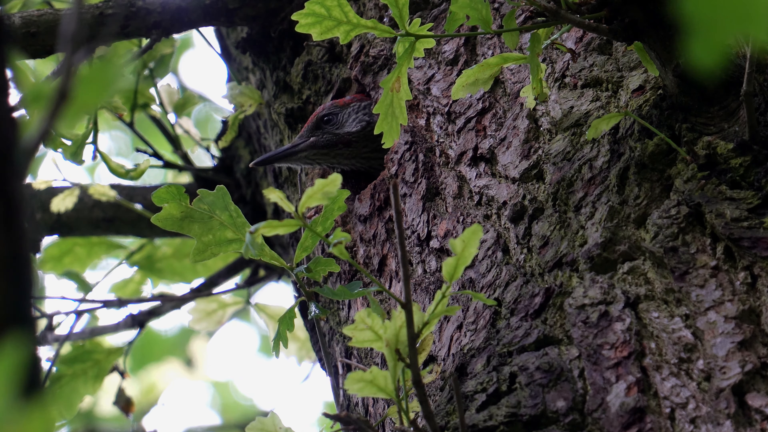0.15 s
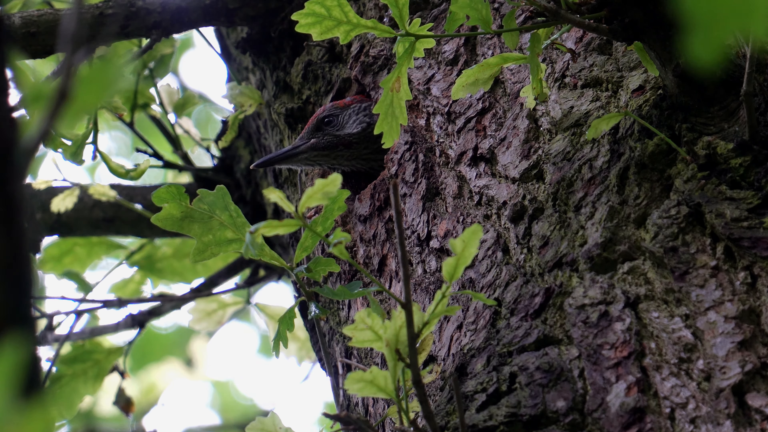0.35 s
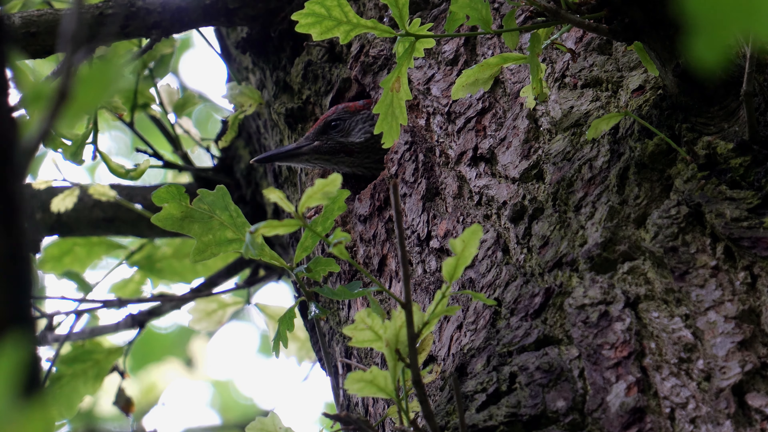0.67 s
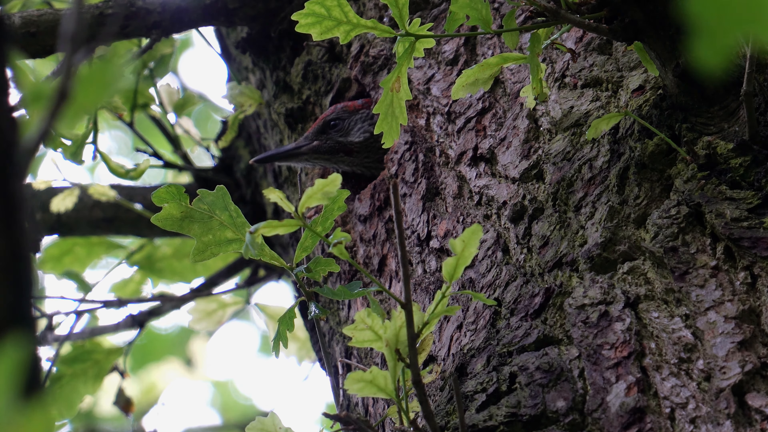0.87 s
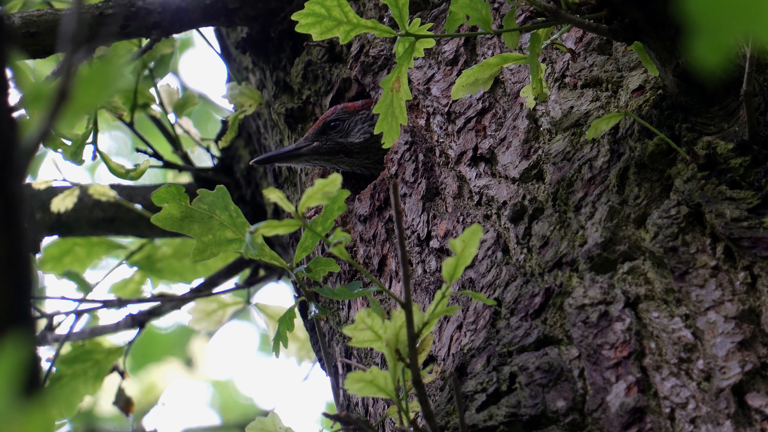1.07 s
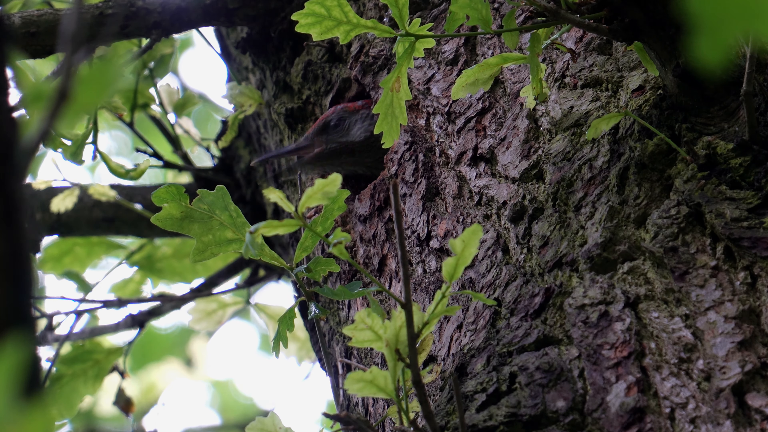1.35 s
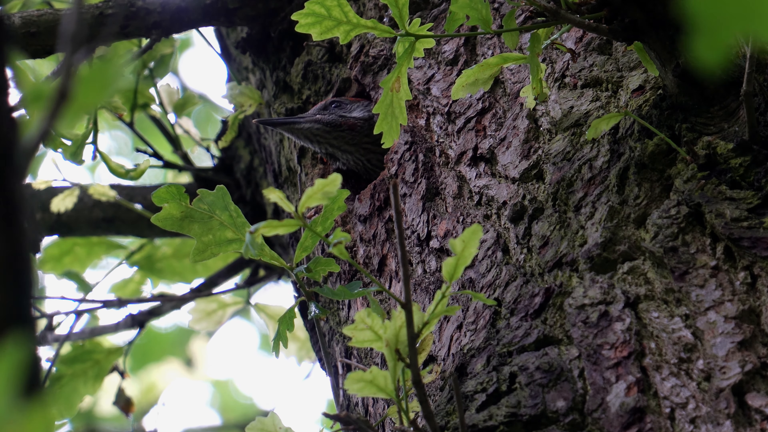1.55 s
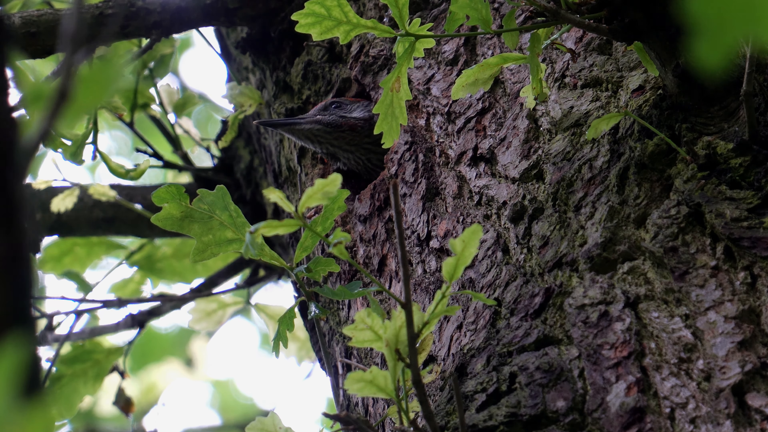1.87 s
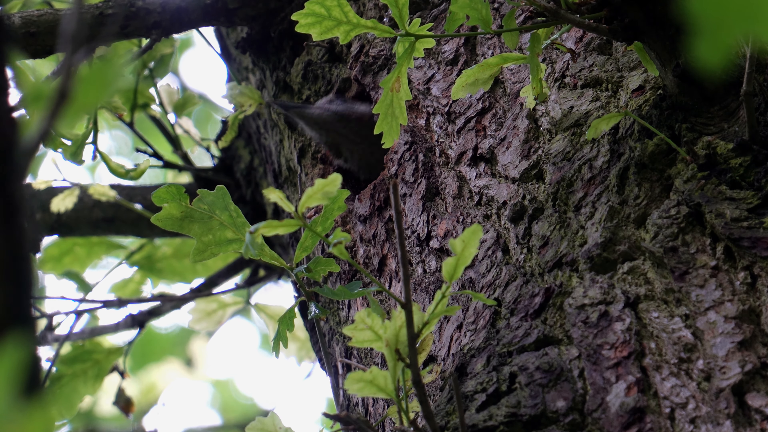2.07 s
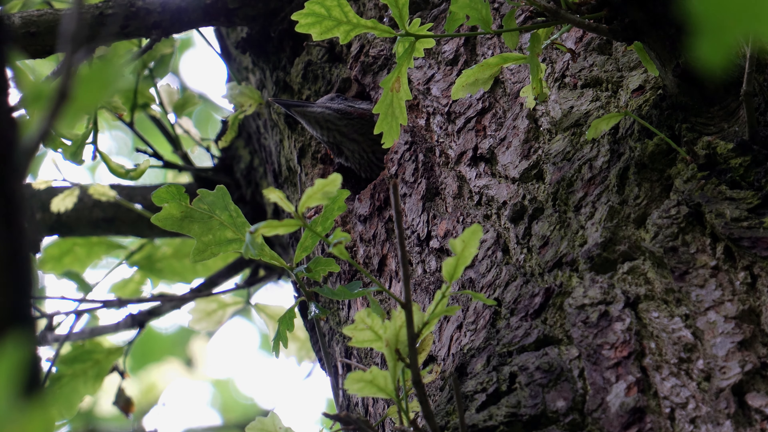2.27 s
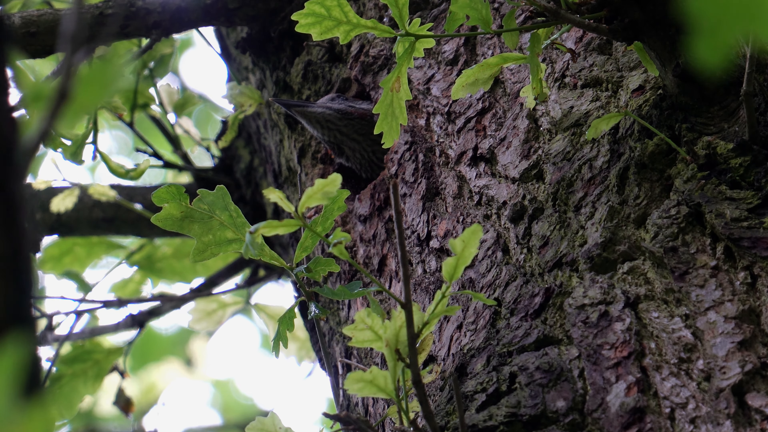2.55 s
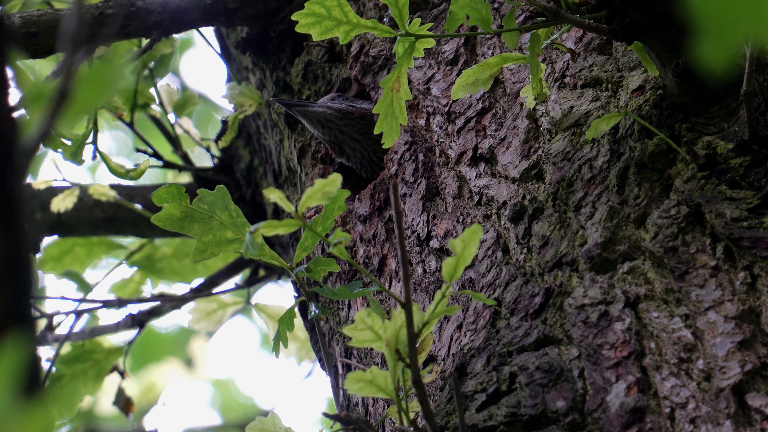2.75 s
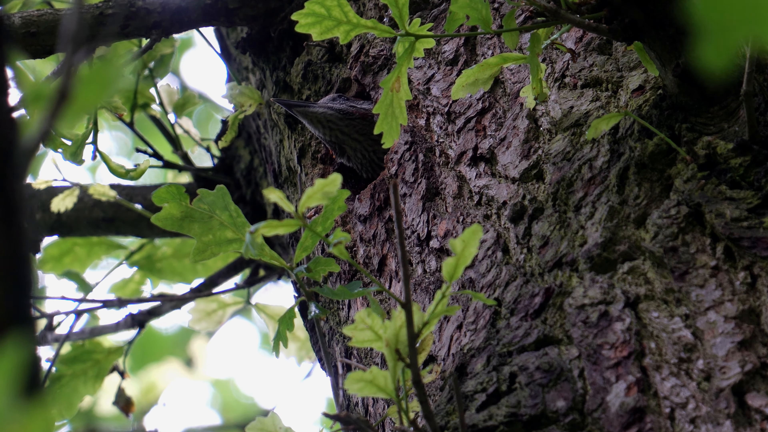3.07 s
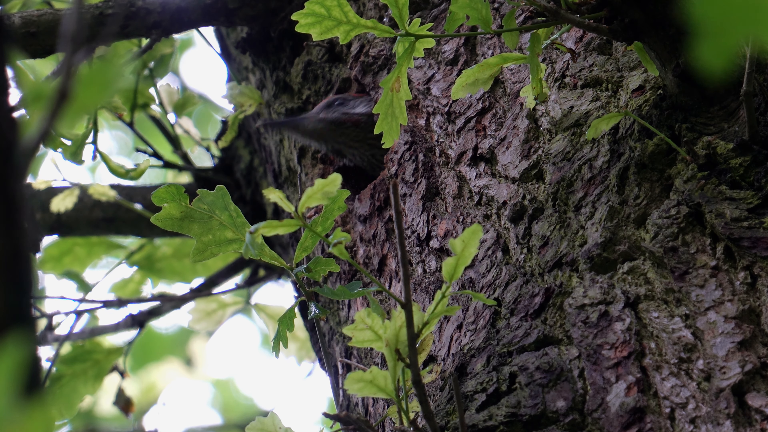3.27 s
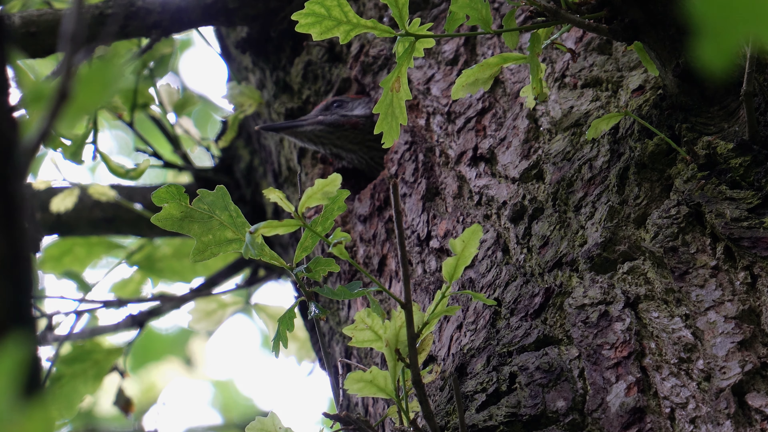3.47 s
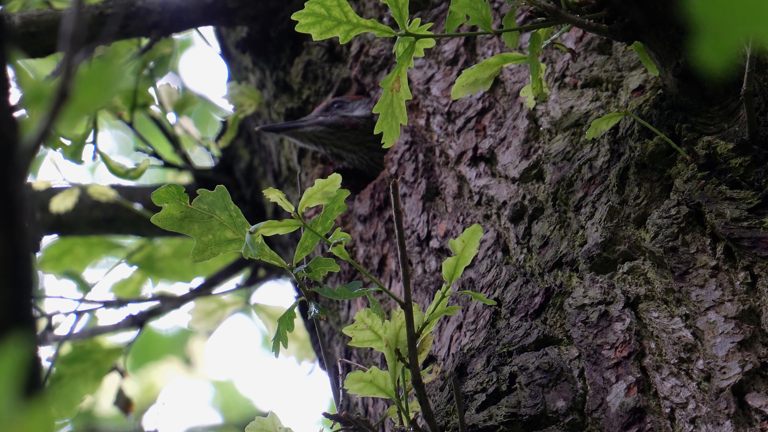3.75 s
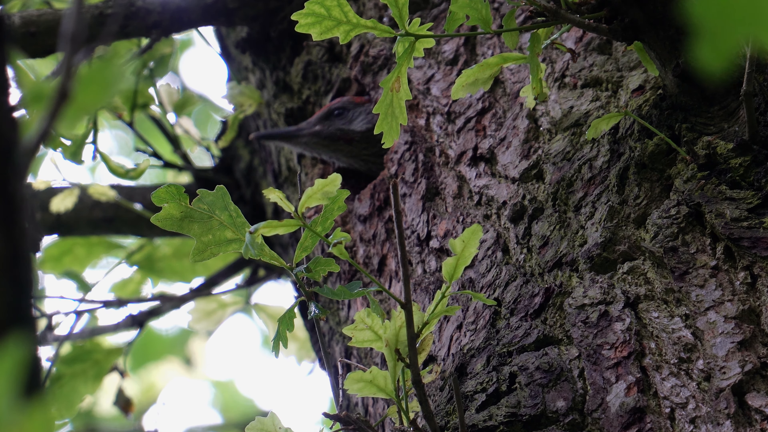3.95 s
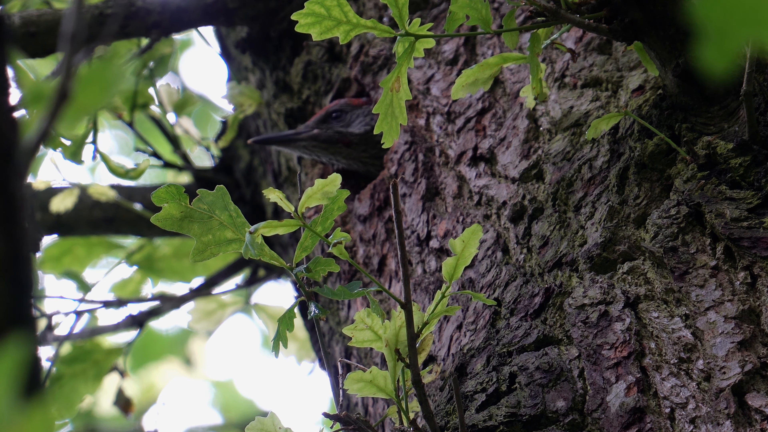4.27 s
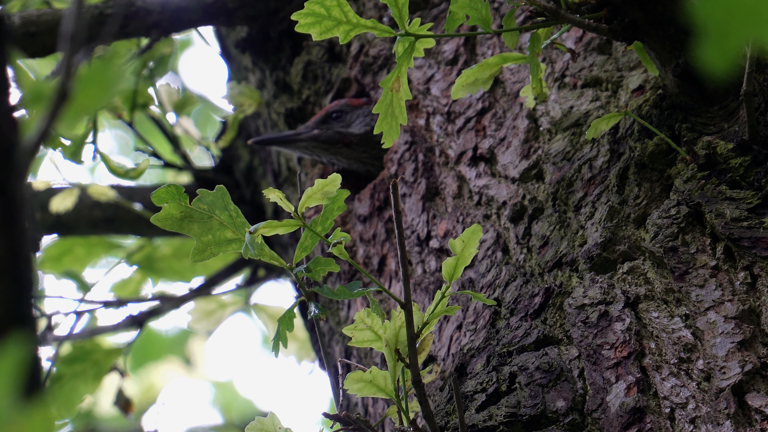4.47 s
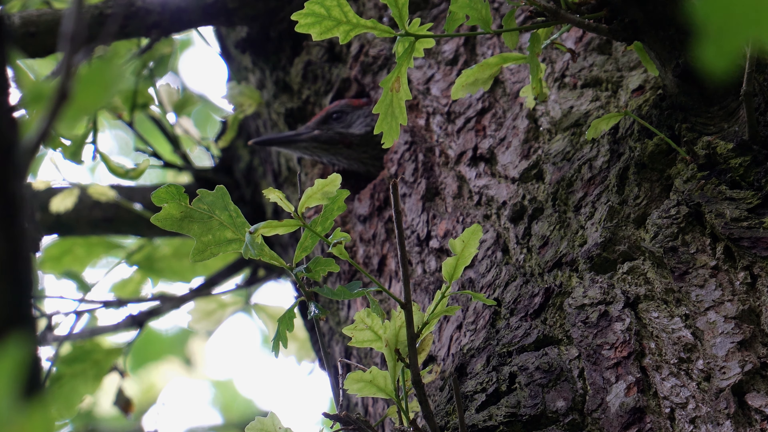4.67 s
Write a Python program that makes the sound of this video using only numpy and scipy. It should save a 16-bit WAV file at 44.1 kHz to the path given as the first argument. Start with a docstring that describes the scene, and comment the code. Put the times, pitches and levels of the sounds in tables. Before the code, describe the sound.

A young woodpecker calls from its nest hole in a wood, close, centred and louder than everything else. Each call is a sharp, high note about a tenth of a second long, opening with a tiny croak and sliding quickly down, with a slight echo. The calls come at about 0.1, 0.7, 1.5, 2.3, 3.4, 4, 5.2, 5.7, 6.3, 6.7, 7.1, 8.3 and 8.8 seconds, the last one the strongest. A quieter thrush, slightly left, sings pure, fluting, lightly warbled notes during the first 1.4 seconds and again from 7.3 seconds until the end. Distant small songbirds add thin, high, reverberant whistles and chirps throughout, with fast trills clearest in the first second, around 3.5 to 4 seconds and around 5 seconds. A soft, steady hush like far traffic runs underneath.

```python
"""An oak wood. A young woodpecker calls a short, sharp "kew" from its nest hole: a croak of pulses
rings the resonances of its throat, then a harmonic tone holds and slides down. A thrush flutes
nearby in almost pure tones. Farther off, small songbirds whistle, sweep and trill, smeared by
scattering among the trunks. A steady hush like far traffic and a faint rumble lie underneath."""
import sys
import numpy as np
from scipy import signal
from scipy.fft import rfft, irfft, next_fast_len
from scipy.io import wavfile
from scipy.ndimage import uniform_filter1d

SR = 44100
rng = np.random.default_rng(int(sys.argv[2]) if len(sys.argv) > 2 else 0)


def materialize(psi):
    """Save the field psi as 16-bit PCM at rate SR to the path in sys.argv[1].

    A 1-D psi becomes a single channel; in a 2-D psi each row is a channel.
    """
    bounded = np.clip(np.atleast_2d(psi).T, -1, 1)
    quanta = np.round(bounded * 32767).astype(np.int16)
    wavfile.write(sys.argv[1], SR, quanta)


N = 433944


def woodpecker():
    """Source and filter: a gliding harmonic tone, plus pulses and breath shaped by the throat."""
    # The calls. Each row: start in seconds, level in dB, top pitch in Hz, time the pitch holds,
    # time the call stays loud and time of the fall, all in seconds, second harmonic lift in dB.
    calls = [(.072, -16.5, 2447, 0.016, .021, 0.057, 0.5), (.677, -16, 2496, .015, 0.019, .07, 0.5),
             (1.473, -17, 2376, 0.0064, 0.024, 0.048, 2), (2.263, -18.5, 2340, 0.0074, 0.015, 0.041, 5.5),
             (3.447, -18.5, 2310, .017, .021, .045, 3.5), (4.016, -16.5, 2432, .018, .023, 0.056, -0.5),
             (5.185, -19.5, 2257, 0.015, 0.022, 0.039, -1.5),
             (5.685, -16.5, 2510, .015, 0.022, 0.059, -4.5), (6.29, -16, 2432, .015, 0.017, .054, -7.5),
             (6.657, -15.5, 2487, 0.0034, 0.024, 0.074, -1.5),
             (7.1, -16.5, 2305, 0.027, 0.025, 0.045, -0.5), (8.273, -16, 2390, 0.017, 0.026, 0.054, 3),
             (8.846, -13.5, 2400, .017, .021, 0.073, -1)]
    slide_hz_per_s, lowest_hz, droop_hz = 17000, 1390, 450   # a last droop adds to the slide
    croak_s, lead_s = .024, .003   # the croak and the tone begin this long before the start
    voice, excitation = np.zeros(N), np.zeros(N) + 1e-18
    jitter, flutter, breath = wander(N, 510), wander(N, 610), rng.standard_normal((2, N))
    for s, db, top_hz, held_s, loud_s, fall_s, second_db in calls:
        t = np.arange(round((held_s + fall_s) * SR)) / SR
        onset = round(s * SR)
        here = slice(onset, onset + len(t))
        fallen = np.clip((t - held_s) / fall_s, 0, 1)
        end_hz = max(top_hz - slide_hz_per_s * fall_s, lowest_hz)
        rise_hz = top_hz * (1 - 0.0617 * np.exp(-t / 0.005))
        hz = rise_hz - (top_hz - end_hz) * fallen ** .9 - droop_hz * fallen ** 8
        hz = uniform_filter1d(hz, size=260) * (1 + 0.01 * jitter[here])
        phase = 2 * np.pi * np.cumsum(hz) / SR
        envelope = (1 - np.exp(-t / .0055)) * np.clip((1 - fallen) / .3, 0, 1)
        softened = np.clip((t - loud_s) / 0.0067, 0, 1)
        fade_db = uniform_filter1d(-7.0 * softened - 8.1 * fallen, size=260)
        tone = harmonics(phase, fallen, fade_db, flutter[here], second_db)
        # Period doubling: strong and weak cycles alternate, adding a line at 1.5 times the pitch.
        tone += from_db(-28.5 + 2 * fade_db + 7.45 * jitter[here]) * np.sin(1.5 * phase)
        add(voice, s - lead_s, from_db(db) * envelope * tone)
        add(excitation, s - lead_s, from_db(db + 2 * fade_db - 37) * envelope * breath[0, here])
        before = slice(onset - round((croak_s + lead_s) * SR), onset)
        add(excitation, s - croak_s, croak(jitter[before], breath[:, before]))
    voice += throat(excitation)
    highpass = signal.butter(2, 500, "high", fs=SR, output="sos")   # a small bird radiates no bass
    return signal.sosfilt(highpass, voice)


def harmonics(phase, fallen, fade_db, flutter, second_db):
    """A periodic vibration is a harmonic series; here the high members flutter more and fade first."""
    # Base levels of harmonics 1 to 6 in dB.
    levels_db = [-1, -5.5, -21.5, -23, -35.5, -31.5]
    upper_db = 5.5 - 3 * np.sqrt(fallen)   # the slide dulls harmonics 3 to 6
    tone = 0
    for k, db in enumerate(levels_db):
        lift_db = (k == 1) * second_db + (k > 1) * upper_db
        flutter_db = (k + 4 * fallen) * flutter
        tone += from_db(db + lift_db + fade_db * (1 + 0.95 * k) + flutter_db) * np.sin((k + 1) * phase)
    return tone


def croak(jitter, noise):
    """Pulse excitation: a quickening train, uneven in timing and strength, sounds rough."""
    start_hz, end_hz = 560, 960
    u = np.arange(len(jitter)) / len(jitter)
    rate_hz = (start_hz + (end_hz - start_hz) * u ** .8) * (1 + .07 * jitter)
    cycles = np.floor(np.cumsum(rate_hz) / SR)
    pulses = np.diff(cycles, prepend=0) * from_db(1.5 * noise[0]) + .06 * noise[1]
    rounded = np.convolve(pulses, np.hanning(6) / 2.5, "same")
    return from_db(-29.5 - 26 * (1 - u) ** 2) * np.minimum(12 * (1 - u), 2) * rounded


def throat(excitation):
    """Resonance: each formant of the throat rings as a damped oscillator."""
    # The formants. Each row: frequency in Hz, bandwidth in Hz, gain in dB.
    formants = [(800, 230, -18.5), (2380, 910, 4), (3800, 1220, 5), (5500, 600, -4.5), (10600, 3300, 1.5)]
    out = np.zeros(N)
    for k, (hz, width_hz, db) in enumerate(formants):
        radius = np.exp(-np.pi * width_hz / SR)
        feedback = [1, -2 * radius * np.cos(2 * np.pi * hz / SR), radius ** 2]
        out += (-1) ** k * from_db(db) * signal.lfilter([1, 0, -1], feedback, excitation)
    return out


def reflections(voice):
    """Interference and echo: a bough's reflection beats with the slide; rough bark returns a smear."""
    bough_s, echo_s, smear_s = .008, 0.057, 0.005
    voice = voice + from_db(-12) * np.pad(voice, (round(bough_s * SR), 0))[:N]
    bark = rng.standard_normal(round(smear_s * SR))
    smeared = signal.fftconvolve(voice, bark / np.linalg.norm(bark))
    echo = np.pad(smeared, (round(echo_s * SR), 0))[:N]
    scatter = wood(voice, gap_s=0.00079, build_s=0.0011, likeness=0.71, decay_scale=0.75)
    return voice * from_db([[-.2], [.2]]) + from_db(-19) * echo + from_db(-6.5) * scatter


def thrush():
    """Almost pure tones a little to the left; amplitude modulation warbles the longer ones."""
    # The song. Each row: start and length in seconds, start, middle and end pitch in Hz, level in dB.
    notes = [(0.205, 0.12, 1874, 1873, 1815, -42), (.37, 0.17, 1822, 1935, 1893, -41.5),
             (0.584, .038, 2880, 2800, 2070, -47.5), (0.622, 0.032, 2860, 2410, 2100, -39),
             (0.703, 0.078, 2310, 2295, 2316, -33), (0.997, 0.13, 2060, 2165, 2058, -36),
             (1.1, 0.18, 2096, 2086, 1990, -34.5), (1.363, 0.037, 2600, 2800, 2950, -52.5),
             (7.295, 0.068, 2093, 1950, 2030, -44), (7.335, .092, 1950, 1770, 1670, -43),
             (7.538, 0.06, 2027, 1990, 1990, -40), (7.605, 0.049, 1880, 1884, 1830, -39),
             (7.666, 0.063, 2030, 2105, 2050, -37.5), (7.807, 0.055, 2710, 2620, 2150, -42.5),
             (7.933, 0.193, 3220, 3120, 3160, -49.5), (7.944, 0.15, 2080, 2317, 2110, -32),
             (8.324, 0.015, 2540, 2490, 2420, -29), (8.488, 0.13, 2700, 2936, 2900, -40),
             (8.895, 0.063, 2580, 2274, 2100, -33.5), (9.343, .052, 2190, 2040, 1850, -47.5),
             (9.744, 0.073, 2130, 2074, 2010, -52)]
    warble_hz, warble_from_s, depth_per_s = 23.9, 0.071, 5.3
    song, waver = np.zeros(N), 0.0053 * wander(N, 78)
    for s, length, *pitches_hz, db in notes:
        note = whistle(length, *pitches_hz, waver[round(s * SR):])
        t = np.arange(len(note)) / SR
        depth = np.clip(depth_per_s * (length - warble_from_s), 0, 1)
        warble = 1 - depth / 2 * (1 + np.sin(2 * np.pi * warble_hz * t))
        add(song, s, from_db(db) * note * warble)
    scatter = wood(song, gap_s=0.0015, build_s=0.0026, likeness=0.52, decay_scale=1.0)
    return song * from_db([[1.1], [-1.1]]) + from_db(-0.5) * scatter


def songbirds():
    """Direct sound weakens with distance, so the far birds arrive mostly as a diffuse field."""
    # Far steady notes. Each row: start and length in seconds, pitch in Hz, level in dB.
    held = [(0, 0.026, 4130, -28), (1.541, .35, 5950, -37.5), (1.875, 0.15, 4085, -36.5),
            (2.157, 0.13, 7480, -42), (2.697, 0.2, 3810, -48), (3.02, 0.11, 7190, -52.5),
            (3.297, 0.05, 5345, -40), (3.622, 0.4, 8640, -46.5), (4.095, 0.088, 5890, -34.5),
            (4.194, 0.13, 6470, -41), (4.304, 0.059, 4058, -38.5), (4.453, 0.089, 7310, -50),
            (6.279, 0.11, 7220, -45), (6.311, 0.57, 4930, -44.5), (6.7, .12, 6915, -39.5),
            (7.745, 0.11, 6083, -34), (8.077, 0.34, 7750, -58), (8.672, 0.13, 7340, -47.5),
            (8.732, 0.15, 6110, -34.5)]
    # Far glides. Each row: start and length in seconds, start and end pitch in Hz, level in dB.
    glides = [(0, 0.13, 6750, 6080, -34.5), (0.014, 0.05, 7000, 7880, -36.5),
              (1.124, .082, 7240, 7800, -36.5), (1.267, 0.071, 7550, 6800, -45),
              (1.365, 0.1, 3800, 3550, -41.5), (2.113, 0.045, 7980, 7060, -35.5),
              (2.166, 0.09, 4580, 3000, -38), (2.456, 0.16, 5806, 5414, -37), (2.516, .26, 7550, 6940, -51),
              (2.627, 0.044, 8640, 8350, -41), (3.349, 0.036, 6100, 8400, -37),
              (3.457, 0.1, 8430, 9180, -40), (3.578, 0.037, 8860, 7280, -41),
              (3.761, .055, 8500, 7300, -43), (4.561, 0.061, 5500, 4100, -40),
              (4.721, 0.056, 6640, 4280, -33.5), (5.536, 0.11, 7060, 7880, -37.5),
              (5.889, 0.1, 4600, 4355, -36), (5.986, 0.049, 5550, 6550, -34.5),
              (6.075, 0.15, 4210, 3440, -46), (6.178, .078, 5220, 6000, -36),
              (6.419, 0.16, 6960, 6640, -39.5), (6.834, 0.25, 7170, 6720, -44.5),
              (7.024, .063, 5560, 3720, -30), (7.696, 0.027, 7850, 5960, -37.5),
              (8.118, 0.12, 5600, 4080, -42.5), (8.119, .1, 5500, 4570, -39),
              (8.57, 0.077, 4360, 3800, -37.5), (8.686, 0.024, 7040, 6100, -31),
              (8.996, 0.15, 5030, 4900, -36.5), (9.152, 0.068, 7790, 7390, -40.5),
              (9.518, 0.068, 6130, 7260, -36.5), (9.625, 0.047, 3850, 5230, -33),
              (9.7, 0.066, 8120, 7130, -38)]
    # Far notes that rise and fall. Each row: start and length in seconds, top pitch in Hz, level in dB.
    arches = [(2.009, .1, 5210, -36), (4.582, .082, 6630, -32.5)]
    # Far trills of falling sweeps. Each row: start and length in seconds, top pitch in Hz, level in dB.
    trills = [(.169, 0.89, 5810, -37.5), (2.851, 0.96, 5790, -49.5), (3.495, 0.55, 5380, -42.5),
              (4.806, 0.73, 5690, -37.5), (7.146, 0.48, 4800, -45.5), (8.269, 0.17, 5530, -40)]
    # Nearer arched squeaks. Each row: start in seconds, top pitch in Hz, level in dB.
    squeaks = [(.286, 8700, -55), (.505, 8460, -57), (.738, 8730, -54), (.98, 8100, -58)]
    # Nearer sharp rising ticks. Each row: start in seconds, middle pitch in Hz, level in dB.
    ticks = [(1.672, 6730, -39), (1.762, 4100, -40.5), (1.801, 4900, -35.5), (1.849, 6970, -43),
             (4.783, 7500, -42.5), (8.552, 7040, -37.5)]
    arch_foot = .89   # start and end pitch as a share of the top
    sweeps_per_s, squeak_s, tick_s = 28.5, .09, 0.0084
    far, near, waver = np.zeros(N), np.zeros(N), .008 * wander(N, 60)
    far_notes = [(s, length, hz, hz, hz, db) for s, length, hz, db in held]
    far_notes += [(s, length, a, a + .6 * (b - a), b, db) for s, length, a, b, db in glides]
    far_notes += [(s, length, arch_foot * hz, hz, arch_foot * hz, db) for s, length, hz, db in arches]
    for s, length, *pitches_hz, db in far_notes:
        add(far, s, from_db(db) * whistle(length, *pitches_hz, waver[round(s * SR):]))
    for s, length, hz, db in trills:
        for start in np.arange(s, s + length, 1 / sweeps_per_s):
            bend = waver[round(start * SR):]
            sweep = whistle(1.6 / sweeps_per_s, hz, .875 * hz, .75 * hz, bend, edge_s=0.0011)
            add(far, start, from_db(db) * sweep)
    near_notes = [(s, squeak_s, arch_foot * hz, hz, arch_foot * hz, db) for s, hz, db in squeaks]
    near_notes += [(s, tick_s, .87 * hz, hz, 1.13 * hz, db) for s, hz, db in ticks]
    for s, length, *pitches_hz, db in near_notes:
        note = whistle(length, *pitches_hz, waver[round(s * SR):], edge_s=0.068 * length)
        add(near, s, from_db(db) * note)
    scatter = wood(far + from_db(1.5) * near, gap_s=0, build_s=0.0031, likeness=0.27, decay_scale=1.02)
    direct = from_db(-17) * far * from_db([[2.5], [-2.5]]) + near * from_db([[0.0], [-6.0]])
    return scatter * from_db([[.7], [-.4]]) + direct


def whistle(length_s, start_hz, middle_hz, end_hz, waver, edge_s=0.0058):
    """Frequency modulation: a soft-edged sine follows a parabola through three pitches, bent by waver."""
    size = round(length_s * SR)
    u = np.arange(size) / size
    hz = start_hz * (1 - u) * (1 - 2 * u) + 4 * middle_hz * u * (1 - u) + end_hz * u * (2 * u - 1)
    phase = 2 * np.pi * np.cumsum(hz * (1 + waver[:size])) / SR
    edges = np.clip(np.minimum(u, 1 - u) * length_s / edge_s, 0, 1)
    return np.sin(edges * np.pi / 2) ** 2 * np.sin(phase)


def wood(sound, gap_s, build_s, likeness, decay_scale):
    """Multiple scattering from trunks: a stereo tail of unit energy builds up and dies band by band."""
    # Reverberation. Each row: frequency in Hz, seconds to fall 60 dB at a decay_scale of 1.
    decay_times = [(500, 1.04), (2500, 0.82), (6000, 1.234), (10000, 1.28), (15000, 0.2)]
    t, edges_hz = np.arange(2 * SR) / SR, 400 * 2 ** np.arange(0, 5.5, .5)
    white, tail = rng.standard_normal((2, len(t))), 0
    for low, high in zip(edges_hz, edges_hz[1:]):
        band = signal.sosfilt(signal.butter(2, [low, high], "band", fs=SR, output="sos"), white)
        t60_s = decay_scale * at_hz(decay_times, np.sqrt(low * high))
        mid, side = band * from_db(-60 * t / t60_s)
        tail += stereo(mid, side, likeness ** (low / 2500))   # the treble scatters more widely
    tail *= 1 - np.exp(-np.maximum(t - gap_s, 0) / build_s)
    return signal.fftconvolve(sound[None], tail / np.sqrt(np.sum(tail ** 2) / 2), axes=1)[:, :N]


def hush():
    """Partial coherence: steady noise, alike on both sides in the bass and unlike in the treble."""
    # The noise spectrum. Each row: frequency in Hz, relative spectral density in dB.
    spectrum = [(35, -62), (60, -28.5), (176, -11.5), (469, 3), (881, 5.5), (2190, -4), (3040, -14),
                (3750, -14.5), (4020, -8.5), (5570, -9), (6410, -7.5), (7380, -23), (8490, -21),
                (9110, -25.5), (16000, -28.5)]
    # Likeness of the two sides. Each row: frequency in Hz, coherence from 0 to 1.
    coherence = [(60, 0.95), (180, 0.99), (550, 0.9), (1650, 0.67), (4970, 0.029), (15000, 0.12)]
    # Balance. Each row: frequency in Hz, left minus right level in dB.
    balance = [(60, -3), (240, 0.5), (950, -3.5), (3770, 0), (8000, -1), (15000, 1.0)]
    size = next_fast_len(N)
    hz = np.maximum(np.arange(size // 2 + 1) * SR / size, 1)
    mid, side = rfft(rng.standard_normal((2, size))) * from_db(at_hz(spectrum, hz))
    pair = stereo(mid, side, at_hz(coherence, hz))
    noise = irfft(pair * from_db(at_hz(balance, hz) / 2 * [[1], [-1]]), size)[:, :N]
    return from_db(-45) * noise / np.std(noise)


def rumble():
    """Narrow-band noise in the bass swells and sinks under a slow envelope."""
    # The envelope. Each row: time in seconds, level in dB.
    swells = [(0.0, -81.5), (1.78, -80.5), (4.52, -83), (4.88, -81.5), (5.26, -82.5), (5.56, -73),
              (6.11, -82), (6.8, -75.5), (8.029, -79.5), (8.331, -72), (8.55, -79.5), (9.54, -69.5),
              (9.84, -76)]
    noise = signal.sosfilt(signal.butter(3, [56, 92], "band", fs=SR, output="sos"), rng.standard_normal(N))
    swell_db = np.interp(np.arange(N) / SR, *np.transpose(swells))
    return from_db(swell_db) * noise / np.std(noise)


def stereo(mid, side, coherence):
    """Sum and difference of two independent noises give a pair of the chosen coherence."""
    return np.sqrt(1 + coherence) * mid + np.sqrt(1 - coherence) * side * [[1], [-1]]


def wander(size, rate_hz):
    """Low-passed noise: a random fluctuation of unit standard deviation."""
    slow = signal.sosfilt(signal.butter(2, rate_hz, fs=SR, output="sos"), rng.standard_normal(size))
    return slow / np.std(slow)


def from_db(db):
    """Decibels to amplitude ratio."""
    return 10 ** (np.asarray(db) / 20)


def at_hz(points, hz):
    """Interpolation on a logarithmic frequency axis."""
    known_hz, values = np.transpose(points)
    return np.interp(np.log(hz), np.log(known_hz), values)


def add(track, s, sound):
    """Superposition: a sound joins a track at s seconds."""
    i = max(round(s * SR), 0)
    track[i:i + len(sound)] += sound[:N - i]


def scene():
    """Superposition: the pressures of the birds, their echoes and the background add."""
    return reflections(woodpecker()) + thrush() + songbirds() + hush() + rumble()


def record(dry):
    """Band limiting: a steep low-pass filter removes the highest treble."""
    stopband_hz = 16100
    return signal.sosfilt(signal.cheby2(12, 70, stopband_hz, fs=SR, output="sos"), dry)


dry = scene()
out = record(dry)
materialize(out)
```